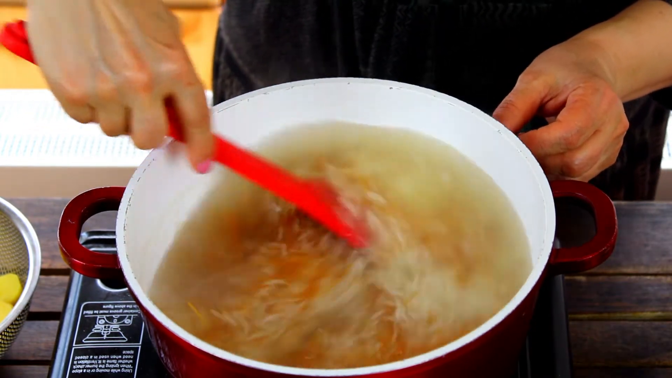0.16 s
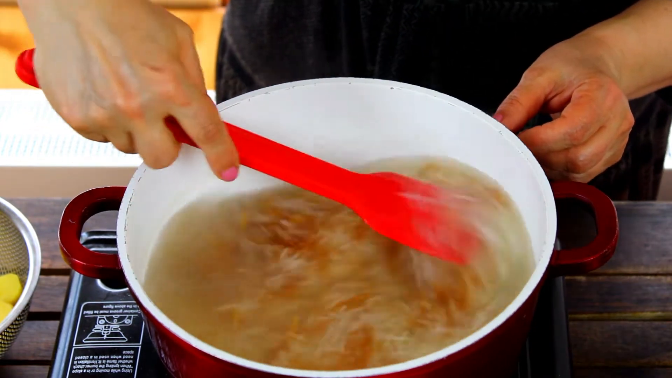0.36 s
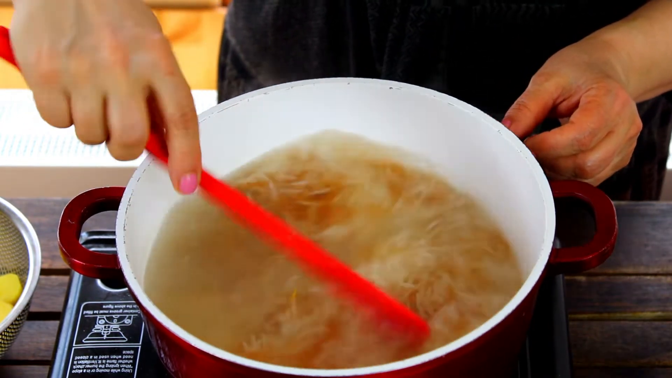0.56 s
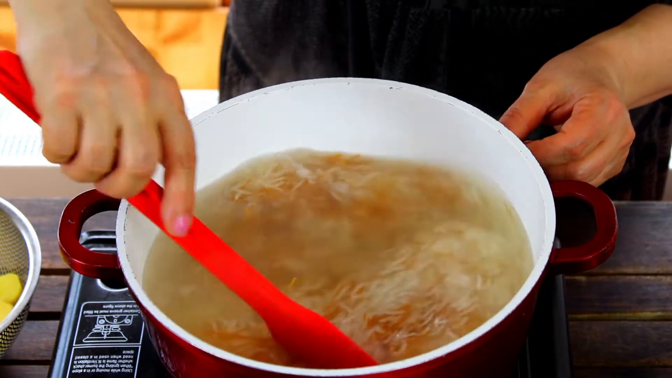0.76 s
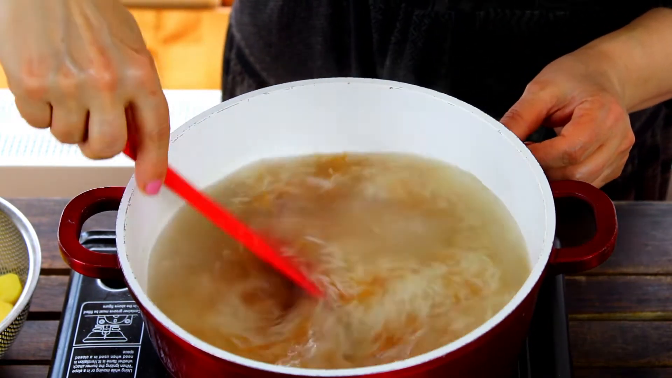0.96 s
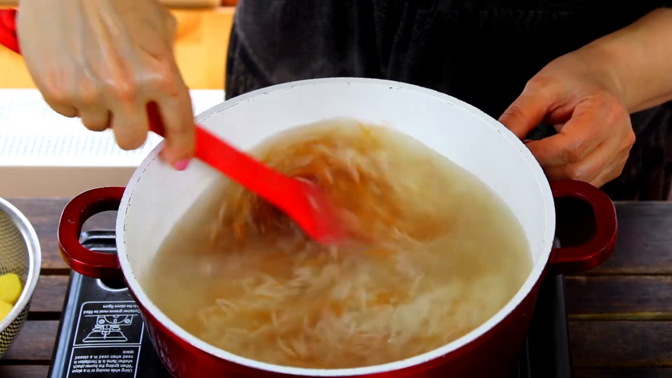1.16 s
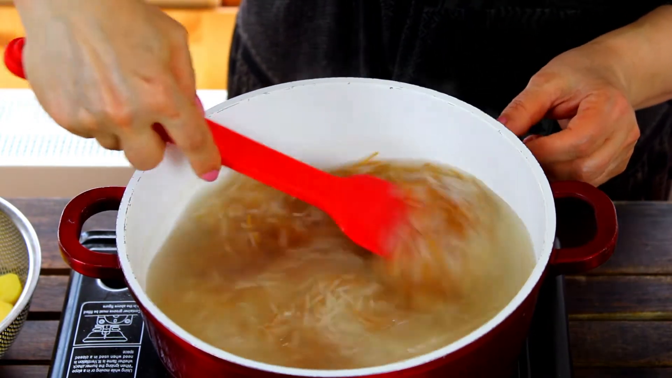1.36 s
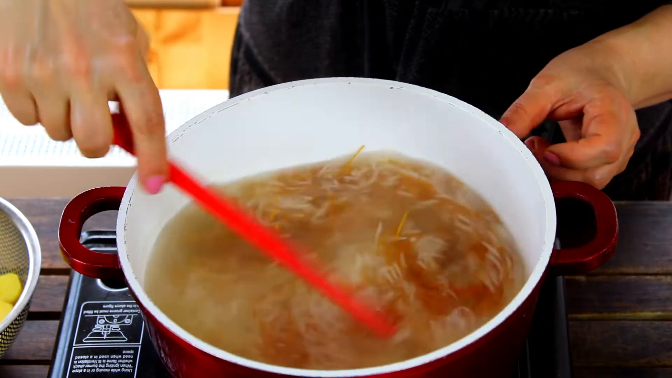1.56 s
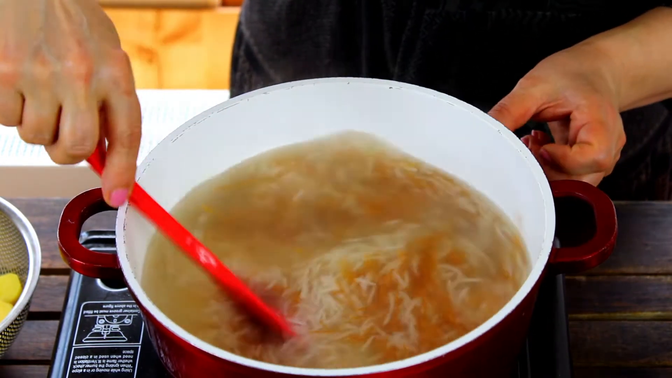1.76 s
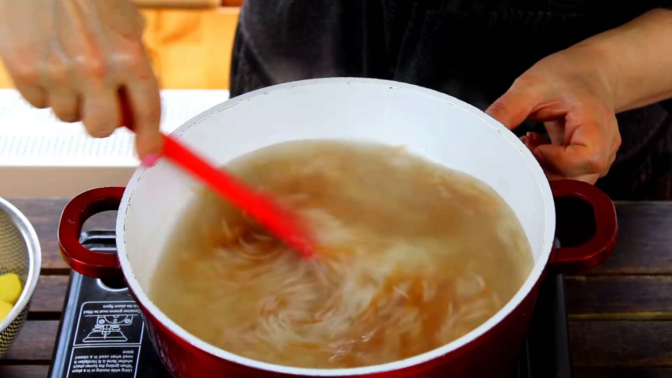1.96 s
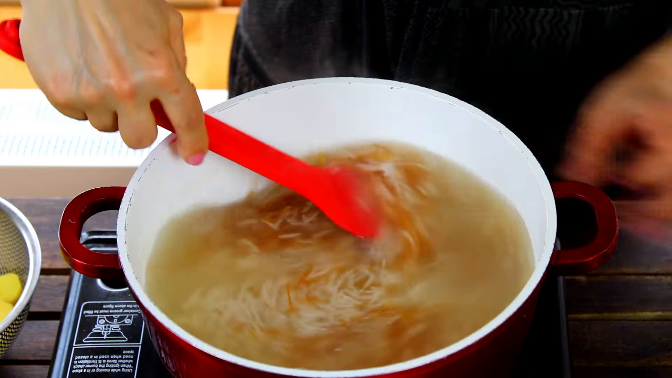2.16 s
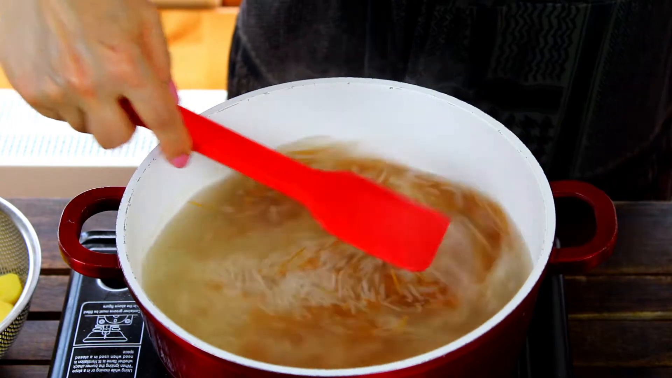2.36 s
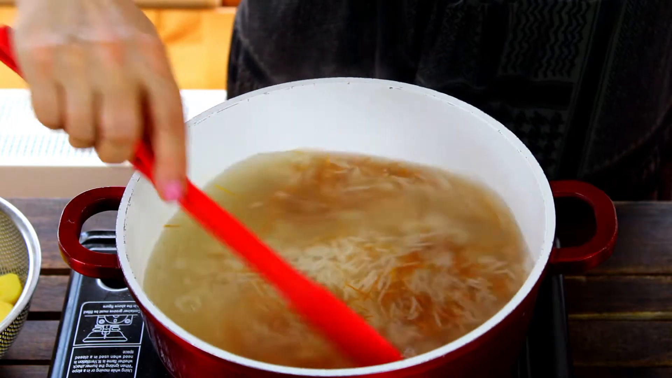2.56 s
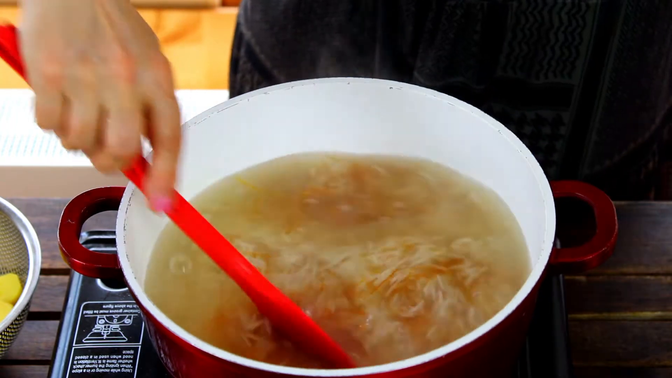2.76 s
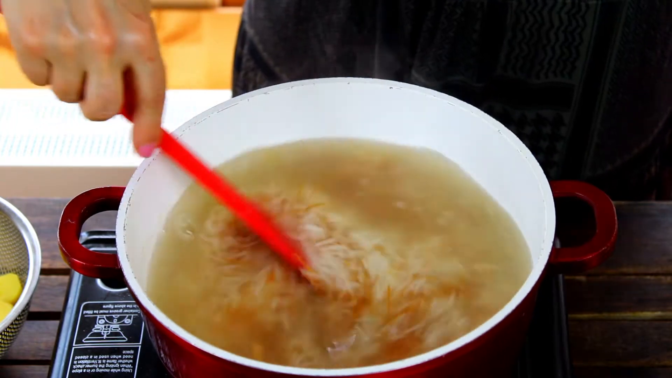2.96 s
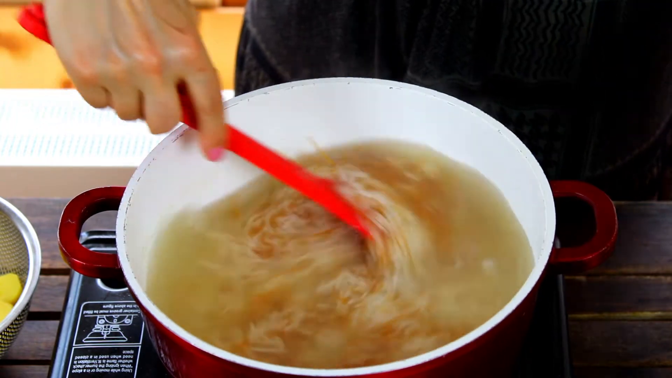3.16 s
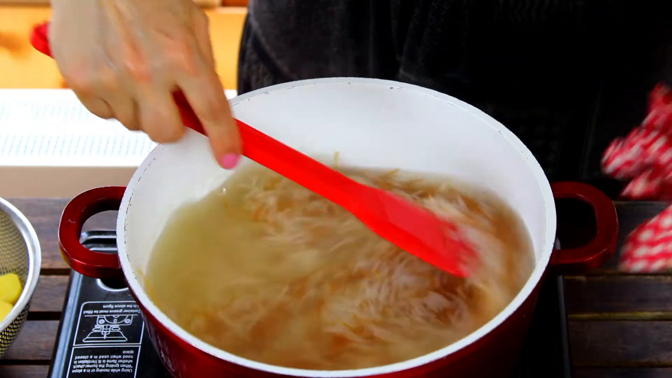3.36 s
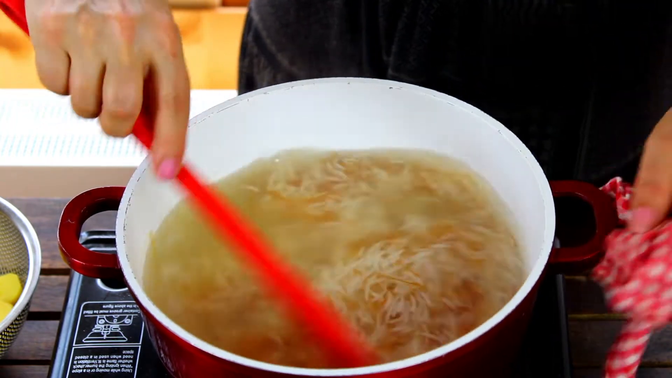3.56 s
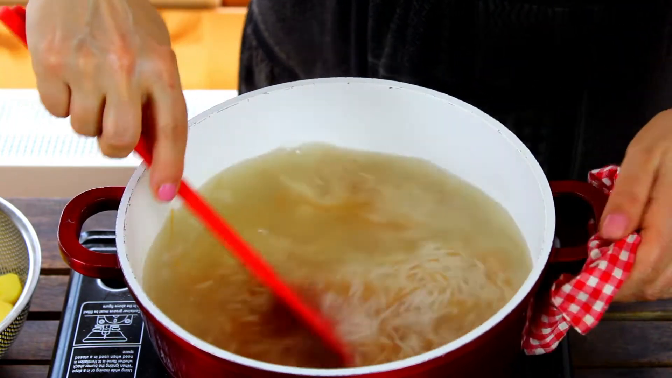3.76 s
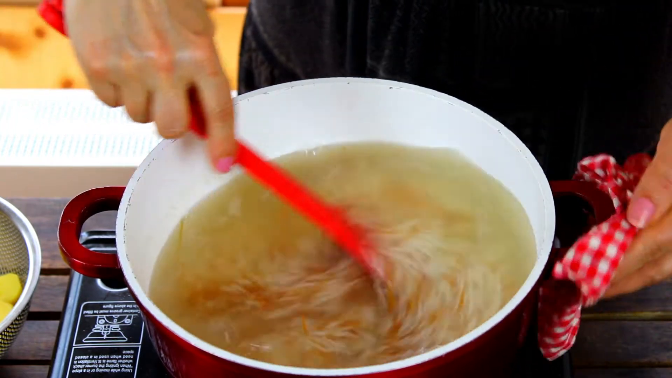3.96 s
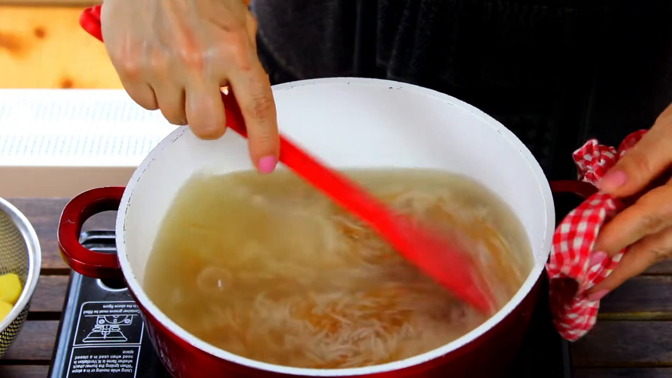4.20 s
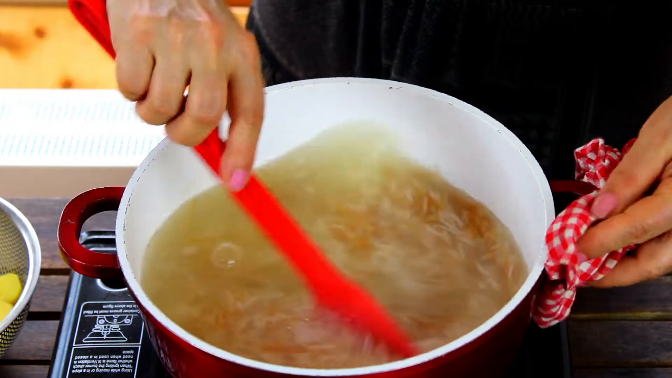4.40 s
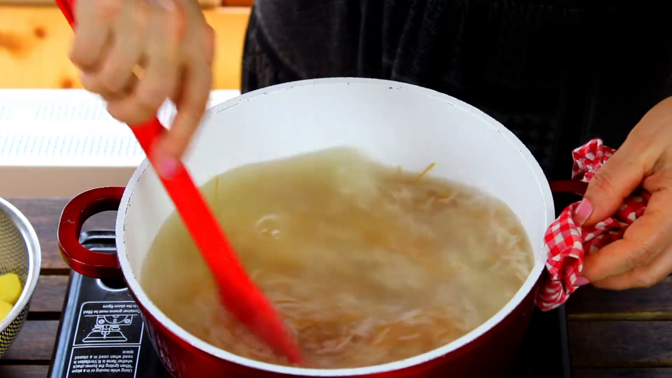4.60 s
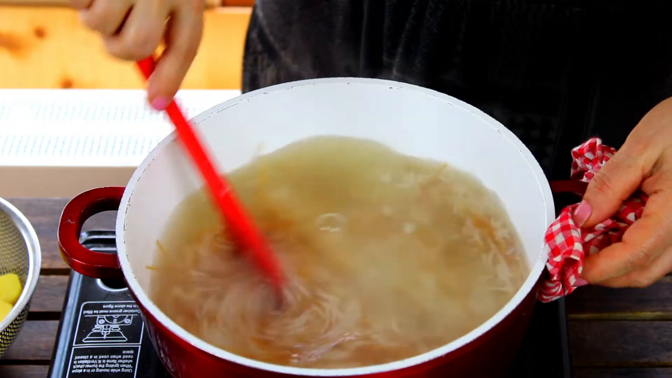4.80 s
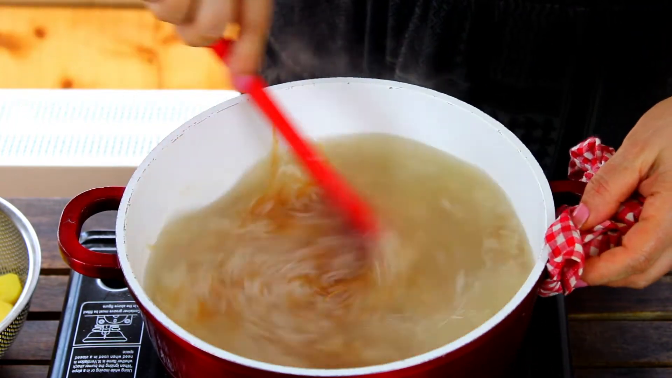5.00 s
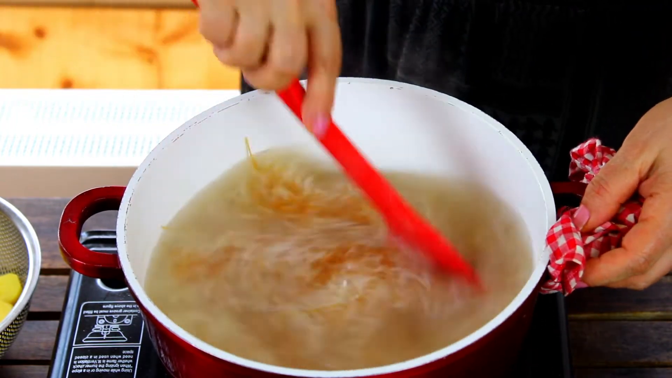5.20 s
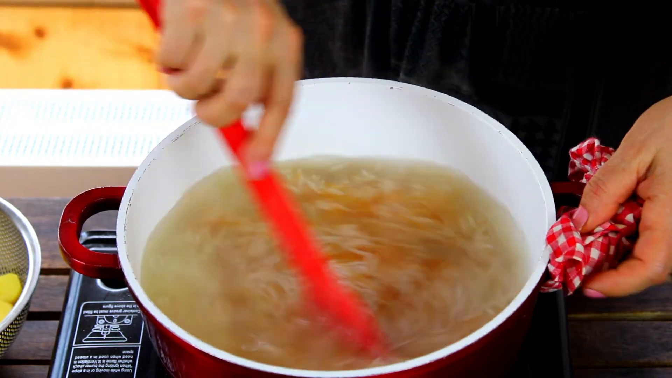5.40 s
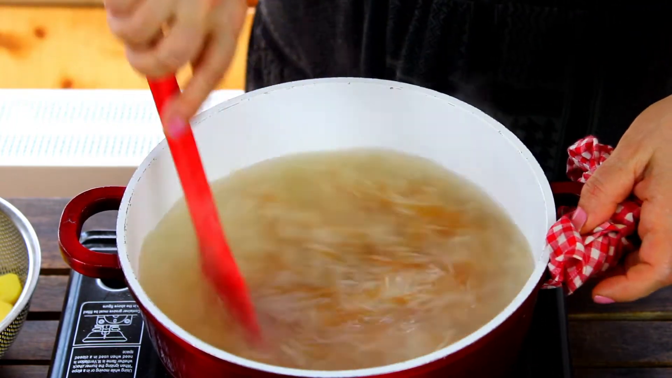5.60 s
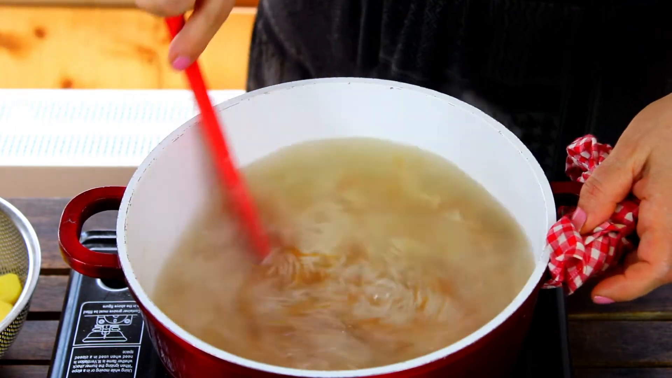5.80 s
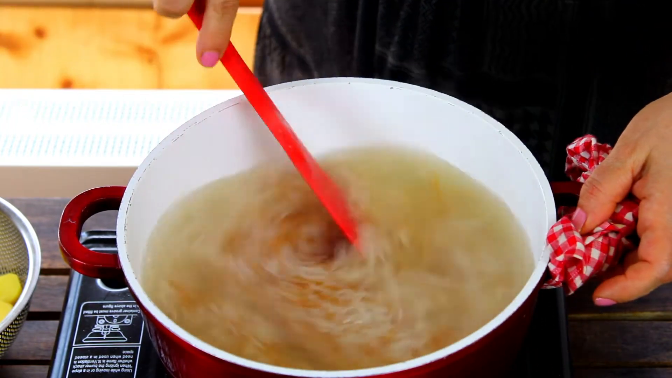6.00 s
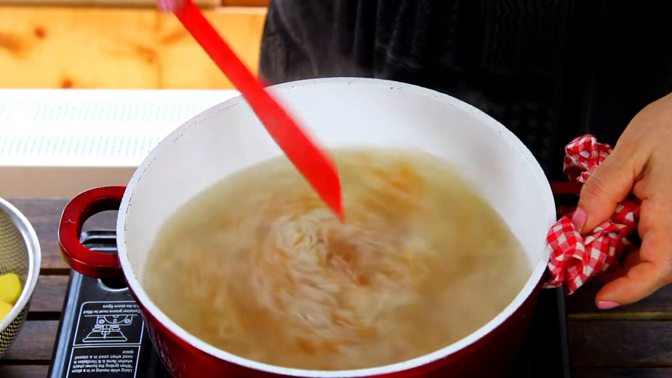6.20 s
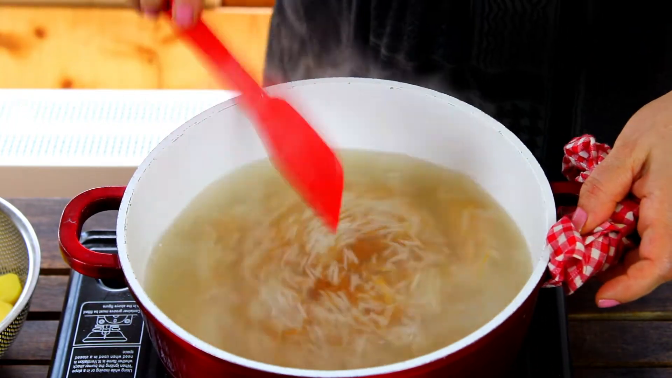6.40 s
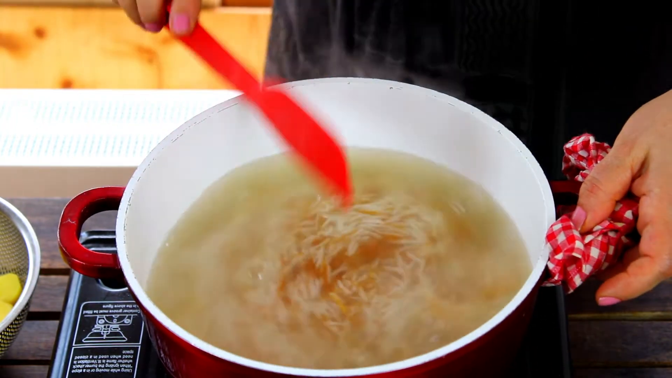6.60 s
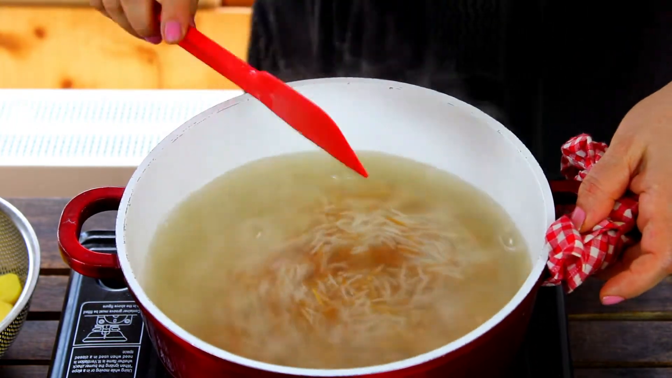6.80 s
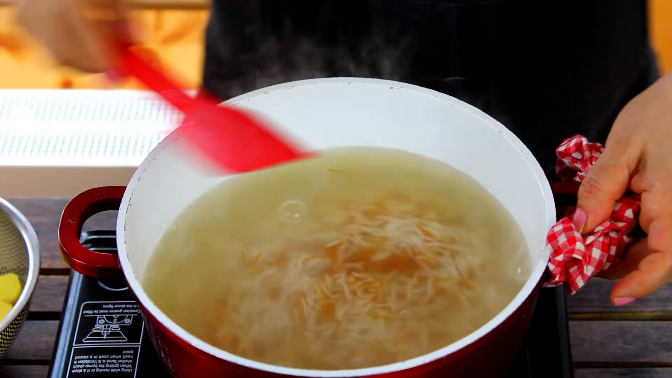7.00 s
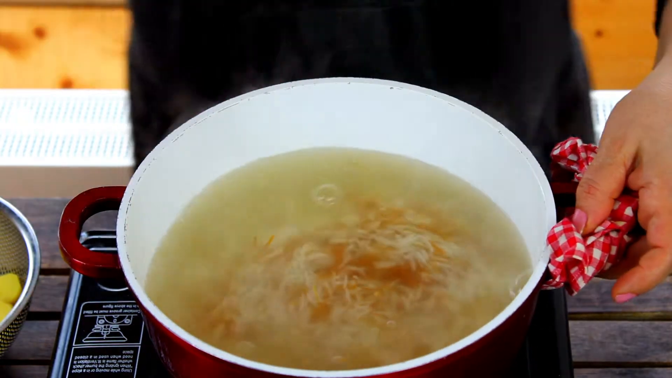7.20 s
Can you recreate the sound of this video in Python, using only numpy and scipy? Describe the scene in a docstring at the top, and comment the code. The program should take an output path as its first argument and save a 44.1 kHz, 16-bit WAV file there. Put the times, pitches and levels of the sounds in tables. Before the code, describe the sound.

A close view of stirring in a pot on a gas burner, in a hard-walled kitchen with short, lively echoes. A very faint, slightly fluttering hiss runs throughout. A light tap at 0.2 s leads to a dull knock with a bright metal clack at 0.3, another knock at 0.5 and weaker ones near 0.75. Similar knock-and-clack pairs come around 1.4, 1.6, 2.15 to 2.3 and 3.3 to 3.5, with a pot tap at 2.9 and soft low table thumps under the jolts. From 3.6 it thins to faint clacks and damped taps at 4.5, 4.75 and 5.0, a knock at 5.1 and a lone clack at 5.9. After near quiet, a dense flurry breaks out at 6.4, with rattles, deeper booms and the loudest, sharpest knocks at 6.75 and 6.85. Another knock at 6.95, tiny dry ticks and a weak knock at 7.2 finish it.

```python
"""Knocks and clacks over a gas burner

Dull wood knocks, bright metal clacks and pot taps in a hard-walled kitchen, ending in a louder flurry.
Knocks are struck modes, a noise crack and a thud; clacks and taps are noise bursts with a ring.
Jolts make two low table modes boom; a burner under a pot hisses as shaped noise.
Each blow except the tiny dry ticks gets its own random echoes."""
import sys
import numpy as np
from scipy import signal
from scipy.fft import rfft, irfft
from scipy.io import wavfile
from scipy.ndimage import uniform_filter1d

SR = 44100
rng = np.random.default_rng(int(sys.argv[2]) if len(sys.argv) > 2 else 0)


def master_out(mix):
    """Clip the mix to full scale and print it as 16-bit PCM to the path in sys.argv[1]."""
    frames = np.transpose(np.atleast_2d(mix))
    ceiling = np.clip(frames, -1, 1)
    pcm = np.round(ceiling * 32767).astype(np.int16)
    wavfile.write(sys.argv[1], SR, pcm)


N = 319725

# dull knocks: (time [s], level [dB], favoured region [about Hz], far fall-off [dB per half octave, below 0 = none],
#   relative thud level [dB], thud centre [Hz], crack t60 [s], shift above 3300 Hz [dB], echo level [dB])
KNOCKS = [(0.292, -28.5, 750, 4, -17.5, 500, 0.056, -3.5, -4),
          (0.518, -29, 950, 0.5, -26, 497, 0.063, -8, -5.5),
          (0.738, -43.5, 960, 4, -29, 463, 0.058, -2, 2.5),
          (0.763, -42.5, 990, 16, -16.5, 470, 0.035, -3.5, -0.5),
          (1.399, -37, 765, 4.5, -10.5, 495, 0.051, -3.5, 0.5),
          (1.606, -27.5, 2800, 1, -23.5, 467, 0.051, -3.5, -5),
          (2.154, -36.5, 1300, 6, -14.5, 475, 0.035, -5, -1.5),
          (2.296, -33.5, 990, 3.5, -28, 210, 0.05, -3.5, -6),
          (2.353, -45.5, 1410, 4, -38, 417, 0.055, -5, -0.5),
          (2.774, -41, 974, 1.5, -28, 339, 0.052, -9, 0),
          (3.271, -39, 860, 3.5, -9, 520, 0.039, -3.5, -0.5),
          (3.459, -30.5, 990, 1, -24.5, 575, 0.064, -4.5, -5.5),
          (5.029, -52, 1260, 10, -10.5, 495, 0.035, -3.5, 1.5),
          (5.117, -34.5, 740, 4.5, -13, 490, 0.058, 0, -3), (5.365, -53.5, 1280, 15, -42, 205, 0.036, 9, 5),
          (6.454, -26, 845, 2.5, -9.5, 430, 0.085, -3.5, -9.5),
          (6.564, -40, 1010, -4, 1.5, 272, 0.25, 0, 0.5), (6.656, -28, 856, 7, -28, 480, 0.06, 12, -6.5),
          (6.729, -36.5, 703, 18, -0.5, 200, 0.025, 8, -5.5),
          (6.74, -17, 1310, 0.5, -22, 406, 0.051, -4.5, -9),
          (6.858, -11.5, 2910, 0.5, -17, 460, 0.053, -1.5, -7.5),
          (6.951, -28.5, 3120, 1.5, -14.5, 480, 0.073, -2, -11),
          (7.182, -40.5, 1270, 3.5, -16.5, 189, 0.05, -7, -4)]
# resonances of the knocked wood, before random spread: (frequency [Hz], width [Hz], level [dB])
WOOD_MODES = [(470, 110, -1), (987, 155, 4), (1333, 80, 1), (1680, 600, -36), (2600, 210, -20),
              (2995, 130, 7.5), (4520, 580, -0.5), (5440, 230, -27), (6950, 110, 4)]
# spectrum of the wood crack: (frequency [Hz], relative level [dB per Hz])
WOOD_CRACK = [(180, -67), (300, -6), (1690, -3.5), (2500, -4), (3000, -4), (3350, -16), (4390, -3.5),
              (7130, -14), (8300, -26), (13500, -16.5), (15700, -24), (16500, -79)]
# bright clacks: (time [s], level [dB], relative low part [dB], burst t60 [s],
#   brightness [dB per octave], relative buzz [dB])
CLACKS = [(0.3019, -18.5, -21.5, 0.044, 0.5, -18), (0.3548, -37, -8.5, 0.061, -1, -18),
          (0.408, -43, -32, 0.086, 0.5, -12), (1.4078, -24.5, -21.5, 0.054, 1.3, -20.5),
          (1.5187, -47.5, -11, 0.092, -1, -17), (2.16, -19.5, -20, 0.036, 0.3, -20.5),
          (2.419, -52, -36, 0.055, -1, -12), (3.2804, -25, -30, 0.053, 0.9, -18),
          (3.6242, -37.5, -35, 0.077, 4.2, -29), (3.844, -46, -32, 0.055, 3, -36),
          (4.3885, -52, -36, 0.081, 2, -11), (5.8689, -31, -33, 0.049, 1.5, -19),
          (6.4075, -27.5, -2, 0.15, -0.5, -19), (6.4533, -40.5, -10, 0.066, 7, -7),
          (6.5723, -28.5, 1.5, 0.2, -1.5, -20), (6.6196, -34, -5, 0.06, -5.5, -27),
          (6.6613, -25.5, -18, 0.046, -1.5, -27), (6.7366, -26.5, -15, 0.13, -1.5, -12)]
# spectrum of the clack burst: (frequency [Hz], relative level [dB per Hz])
CLACK_COLOUR = [(880, -7), (1500, -5.5), (2150, -9), (2430, -4.5), (3970, -5.5), (4300, -0.5), (5640, -4.5),
                (7320, -6), (8170, -12.5), (13500, -1), (15500, -10.5), (16500, -38)]
# resonances of the loose metal: (frequency [Hz], width [Hz], t60 [s])
LOOSE_METAL = [(4310, 300, 0.099), (7130, 210, 0.088)]
# taps on the pot: (time [s], level [dB], relative ring [dB], relative low part [dB])
TAPS = [(0.2016, -42, -19, -18), (1.261, -53.5, -13, -16), (2.0052, -56, -19, -13),
        (2.906, -26.5, -20.5, -24), (4.511, -27.5, -21.5, -17.5), (4.7581, -35, -16, -14),
        (4.9766, -34, -16.5, -17.5)]
# spectrum of the tap click: (frequency [Hz], relative level [dB per Hz])
TAP_COLOUR = [(880, -8.5), (1500, -9), (1660, -9.5), (2630, -7.5), (2970, -1), (3280, -6.5), (5260, -6.5),
              (5750, -15), (6960, 0), (8860, -19), (13800, -1), (15900, -19), (16500, -41)]
# ring of the pot: (frequency [Hz], relative level [dB], t60 [s])
POT_MODES = [(484, -9, .14), (1287, 0, .1), (1410, -2, .11), (2930, 3, .03), (3020, 1, .035)]
# tiny dry ticks: (time [s], level [dB])
TICKS = [(6.9894, -41), (7.017, -37), (7.066, -38)]
# jolts that reach the table: (start [s], lowest mode swell [dB], second mode swell [dB])
JOLTS = [(0.295, -53, -67), (0.52, -57.5, -56.5), (0.726, -47, -57.5), (0.8, -59, -63), (0.38, -64, -58),
         (0.899, -63, -62.5), (1.4, -59, -62), (1.62, -60, -54), (1.819, -71, -67.5), (2.02, -80, -74),
         (2.16, -56.5, -58.5), (2.33, -71, -76), (2.7, -53, -63.5), (2.82, -58, -72), (2.9, -82, -68),
         (3.05, -86, -73), (3.27, -57, -58), (3.46, -59.5, -59.5), (3.62, -64, -67), (3.69, -60.5, -69.5),
         (4.33, -73, -86), (4.465, -61, -65), (4.52, -75, -62), (4.89, -83, -66), (4.99, -70, -70),
         (5.11, -57, -68), (5.19, -63, -66), (6.17, -86, -68.5), (6.25, -80, -69), (6.41, -45.5, -46),
         (6.55, -56, -40), (6.65, -58, -61), (6.71, -46, -39.5), (6.84, -41, -37), (6.91, -48, -49),
         (6.97, -58, -66)]
# table modes: (frequency [Hz], width [Hz])
TABLE_MODES = [(51, 40), (127, 20.4)]
# delay from jolt to peak: one per table mode [s]
SWELL_S = [0.052, 0.046]
# swell exponent, higher = quicker rise and fall: one per table mode [-]
SWELL_STEEPNESS = [2.84, 2.12]
# floor under the swells: one per table mode [dB]
REST_DB = [-82.5, -79]
# burner hiss, cut off above the last point: (frequency [Hz], relative level [dB per Hz])
FLAME_COLOUR = [(55, -25), (90, -5.5), (150, 1), (210, 6.5), (320, -2.5), (1520, -19), (1920, -13),
                (3520, -11.5), (4620, -12), (6960, -10), (8800, -12.5), (13500, -9.5), (15800, -13.5)]
# humps in the hiss spectrum: (frequency [Hz], width [Hz], nominal height relative to hiss [dB])
HISS_HUMPS = [(660, 60, 6), (1290, 60, 5), (1740, 60, 5), (1900, 200, 9), (3450, 250, 9), (3950, 120, 3),
              (5400, 60, 5), (6250, 250, 3), (6900, 90, 11), (7110, 90, 11), (7650, 200, 7), (8350, 120, 6),
              (9150, 80, 3), (11000, 380, 10), (12130, 220, 9), (13020, 120, 6), (12600, 300, 3),
              (13720, 500, 8), (14600, 350, 3), (15650, 160, 6)]
# echo decay: (frequency [Hz], t60 [s])
ROOM_T60 = [(200, 0.71), (500, 0.43), (1500, .42), (4000, 0.29), (8000, 0.22), (14000, 0.14)]

WOOD_BLUR_BINS, POT_BLUR_BINS = 140, 50  # spectral lines over which echoes even out a blow's colour
FLAME_DB, CLACK_RISE_S, EDGE_HZ = -65, 0.0015, 16600


def gain_of(db):
    """Decibels to amplitude."""
    return 10 ** (np.asarray(db) / 20)


def evened(x):
    """Scales to rms 1."""
    return x / np.sqrt(np.mean(x ** 2) + 1e-20)


def read(points, hz):
    """Interpolates a curve linearly over log frequency."""
    point_hz, value = np.transpose(points)
    return np.interp(np.log(hz + 1), np.log(point_hz + 1), value)


def add(mix, start_s, sound):
    """Adds a sound at start_s, cut at the end of the mix."""
    part = mix[round(start_s * SR):][:len(sound)]
    part += sound[:len(part)]


def noise(gain, count):
    """Gaussian noise of rms 1 shaped by gain(hz)."""
    spectrum = rfft(rng.standard_normal(count))
    return evened(irfft(spectrum * gain(np.fft.rfftfreq(count, 1 / SR)), count))


def band(centre_hz, width_hz):
    """Gain of one resonance."""
    return lambda hz: 1 / (1 + (2 * (hz - centre_hz) / width_hz) ** 2)


def low_body(centre_hz, width_hz):
    """Gain of a broad low resonance that stops short above about 600 Hz."""
    def gain(hz):
        body = band(centre_hz, width_hz)(hz) + 0.79
        bass_cut = hz ** 2 / (hz ** 2 + 140 ** 2)
        return body / (1 + (hz / 620) ** 10) * bass_cut
    return gain


def knock(level_db, top_hz, fall_db, thud_db, thud_hz, t60_s, edge_db):
    """Wood modes struck at once, a crack of noise and a slower low thud."""
    def spot_db(hz):
        # spot and hardness of the blow favour one region
        octaves = np.log2((hz + 50) / top_hz)
        fall = max(fall_db, 0) * (np.sqrt(1 + 4 * octaves ** 2) - 1)
        return edge_db / (1 + (3300 / (hz + 1)) ** 12) - fall

    t = np.maximum(np.arange(8192) / SR - 0.001, 0)  # knock starts 1 ms after its listed time

    hz, width_hz, mode_db = np.transpose(WOOD_MODES)[:, :, None]
    level_spread, pitch_spread = rng.standard_normal((2, len(WOOD_MODES), 1))  # no two blows alike
    mode_gain = gain_of(mode_db + spot_db(hz) + 1.7 * level_spread)
    modes = np.sin(2 * np.pi * hz * (1 + 0.012 * pitch_spread) * t)
    ring = (mode_gain * np.exp(-np.pi * width_hz * t) * modes).sum(0)

    crack = noise(lambda f: gain_of(read(WOOD_CRACK, f) + spot_db(f)), count=len(t))
    crack = crack * gain_of(-60 * t / t60_s) * (1 - np.exp(-t / 0.0014))

    push = gain_of(10 - 60 * t / 0.025) * np.sin(2 * np.pi * thud_hz * t)  # first flex of the board
    thud = noise(low_body(thud_hz, 140), count=len(t))
    thud = thud * gain_of(-60 * t / 0.22) * (1 - np.exp(-t / 0.004))
    thud = gain_of(thud_db) * (thud - push)

    ring = ring / abs(ring).max()
    return gain_of(level_db) * (gain_of(-3.0) * ring + gain_of(-7.0) * crack + gain_of(-4.0) * thud)


def clack(level_db, low_db, t60_s, bright_db, buzz_db):
    """Loose metal jolted by a blow: a burst and a brief buzz of decaying noise bands."""
    t = np.arange(8192) / SR
    buzz = sum(gain_of(-60 * t / buzz_t60_s) * noise(band(hz, width_hz), count=len(t))
               for hz, width_hz, buzz_t60_s in LOOSE_METAL)
    buzz = gain_of(buzz_db - 5.5) * buzz * (1 - np.exp(-t / CLACK_RISE_S))
    return gain_of(level_db) * (rattle(CLACK_COLOUR, bright_db, low_db, t60_s, CLACK_RISE_S) + buzz)


def tap(level_db, ring_db, low_db):
    """A click on the wall of the pot and its water-damped modes."""
    t = np.arange(8192) / SR
    ring = sum(gain_of(mode_db - 60 * t / t60_s) * np.sin(2 * np.pi * (hz * t + rng.random()))
               for hz, mode_db, t60_s in POT_MODES)
    ring = gain_of(ring_db + 6.5) * ring * (1 - np.exp(-t / 0.0065))
    click = rattle(TAP_COLOUR, bright_db=0, low_db=low_db + 1.5, t60_s=0.056, rise_s=0.0003)
    return gain_of(level_db) * (click + ring)


def rattle(colour, bright_db, low_db, t60_s, rise_s):
    """A noise burst of treble over a short low knock."""
    t = np.arange(8192) / SR

    def burst_gain(hz):
        return gain_of(read(colour, hz) + bright_db * np.log2((hz + 50) / 7000))

    burst = noise(burst_gain, count=len(t))
    burst = gain_of(-8.5) * burst * gain_of(-60 * t / t60_s) * (1 - np.exp(-t / rise_s))
    low = noise(low_body(530, 330), count=len(t))
    low = low * gain_of(low_db - 6.5 - 60 * t / 0.19) * (1 - np.exp(-t / 0.0071))
    return burst + low


def tick(level_db):
    """A snap of broad treble noise, over in a few milliseconds."""
    t = np.arange(1024) / SR
    return gain_of(level_db - 8.5 - 60 * t / 0.01) * noise(band(6400, 11000), count=len(t))


def table():
    """Two low modes, swelling and dying after each jolt, their pitch wavering as they are shaken."""
    start_s, *swells_db = np.transpose(JOLTS)
    t = np.arange(0, N, 32) / SR  # coarse envelope grid
    out = 0
    for swell_db, mode, swell_s, steepness, rest_db in zip(
            swells_db, TABLE_MODES, SWELL_S, SWELL_STEEPNESS, REST_DB):
        u = np.maximum(t - start_s[:, None], 0) / swell_s
        swells = gain_of(swell_db)[:, None] * (u * np.exp(1 - u)) ** steepness
        envelope = np.sqrt((swells ** 2).sum(0) + gain_of(rest_db) ** 2)
        level = np.interp(np.arange(N) / SR, t, envelope)
        shake = signal.hilbert(noise(band(*mode), count=N + 275))[:N]
        steadied = (shake / (abs(shake) + 0.27) ** 0.31).real  # milder random level swings
        out = out + level * evened(steadied)
    return out


def flame():
    """Noise hiss with spectral humps, fluttering slightly in time-frequency patches."""
    def colour(hz):
        humps = sum(gain_of(hump_db) * band(hump_hz, width_hz)(hz) for hump_hz, width_hz, hump_db in HISS_HUMPS)
        return gain_of(read(FLAME_COLOUR, hz)) * (1 + 1.01 * humps) * (hz < FLAME_COLOUR[-1][0])

    _, _, spectrum = signal.stft(noise(colour, count=N), SR, nperseg=512)
    patches = uniform_filter1d(rng.standard_normal(spectrum.shape), 8, 0)
    patches = evened(uniform_filter1d(patches, 10, 1))
    hiss = signal.istft(spectrum * gain_of(0.93 * patches), SR, nperseg=512)[1][:N]
    return gain_of(FLAME_DB) * evened(hiss)


def room(blow, blur_bins):
    """Sparse echoes of random sign in the colour of the blow, each band dying at its own speed."""
    echoes = np.zeros(32768)
    at = np.arange(200, 22000, 20)
    build_up = 1 - np.exp(-at / SR / 0.0097)
    echoes[at + rng.integers(0, 20, len(at))] = rng.choice([-1., 1.], len(at)) * build_up
    clumps = evened(uniform_filter1d(rng.standard_normal(len(echoes)), size=300))
    echoes = echoes * gain_of(1.54 * clumps)  # near walls return the sound in uneven bunches

    hz, t, spectrum = signal.stft(echoes, SR, nperseg=256)
    decay = gain_of(-60 * t / read(ROOM_T60, hz)[:, None])
    tail = signal.istft(spectrum * decay, SR, nperseg=256)[1][:len(echoes)]

    # many paths blur the fine spectrum
    power = abs(rfft(blow, len(echoes))) ** 2
    colour = np.sqrt(abs(uniform_filter1d(power, size=blur_bins)))
    return irfft(rfft(tail / np.linalg.norm(tail)) * colour, len(echoes))[:24000]


def scene():
    """Blows with their own echoes, and dry ticks, over boom and hiss."""
    mix = table() + flame()
    blows = [(s, knock(*row), echo_db, WOOD_BLUR_BINS) for s, *row, echo_db in KNOCKS]
    blows += [(s, clack(*row), -8.0, WOOD_BLUR_BINS) for s, *row in CLACKS]
    blows += [(s, tap(*row), -9.0, POT_BLUR_BINS) for s, *row in TAPS]
    for start_s, blow, echo_db, blur_bins in blows:
        add(mix, start_s, blow)
        add(mix, start_s, gain_of(echo_db) * room(blow, blur_bins))
    for start_s, level_db in TICKS:
        add(mix, start_s, tick(level_db))
    return mix[None]


def record(dry):
    """The microphone loses the deepest bass; then the recorder limits the band at EDGE_HZ."""
    thinned = signal.sosfilt(signal.butter(2, 32, "high", fs=SR, output="sos"), dry)
    lowpass = signal.firwin(511, EDGE_HZ, window=("kaiser", 9), fs=SR)
    return signal.oaconvolve(thinned, lowpass[None], "same")


dry = scene()
out = record(dry)
master_out(out)
```